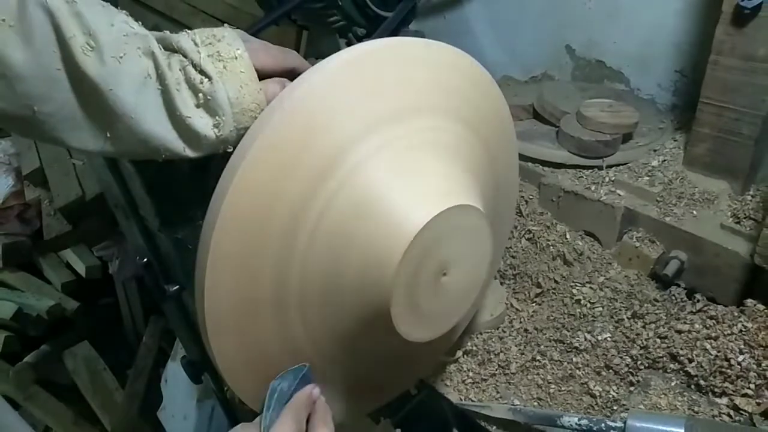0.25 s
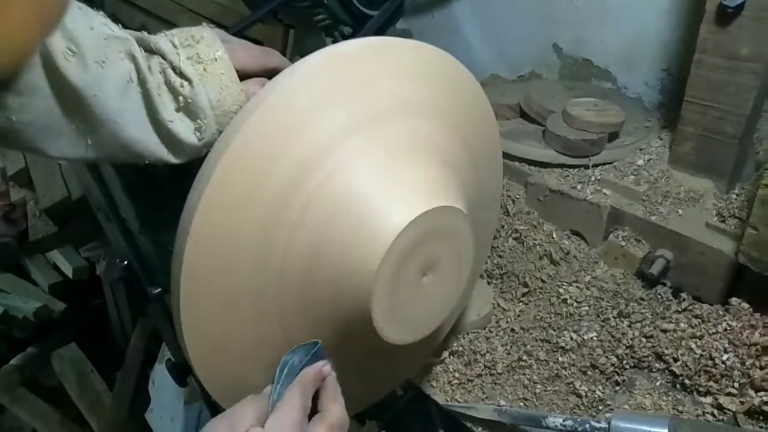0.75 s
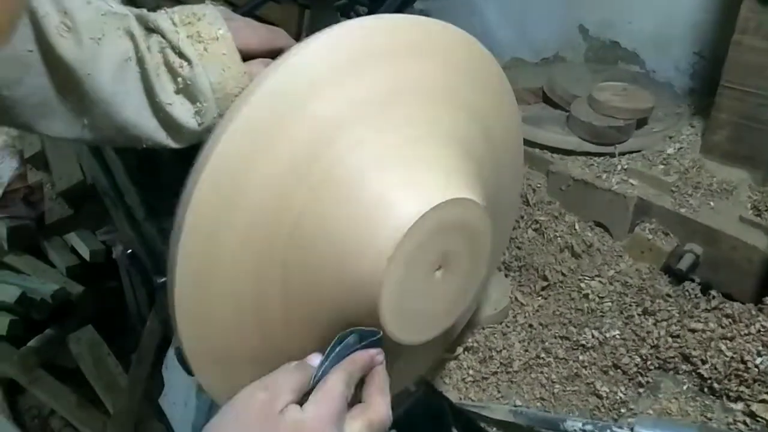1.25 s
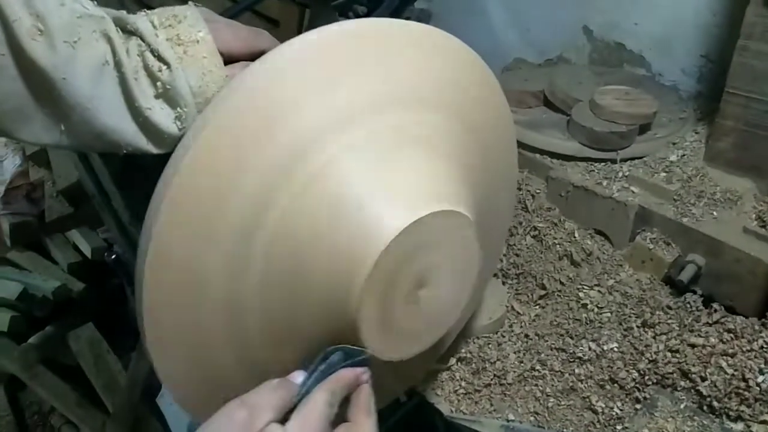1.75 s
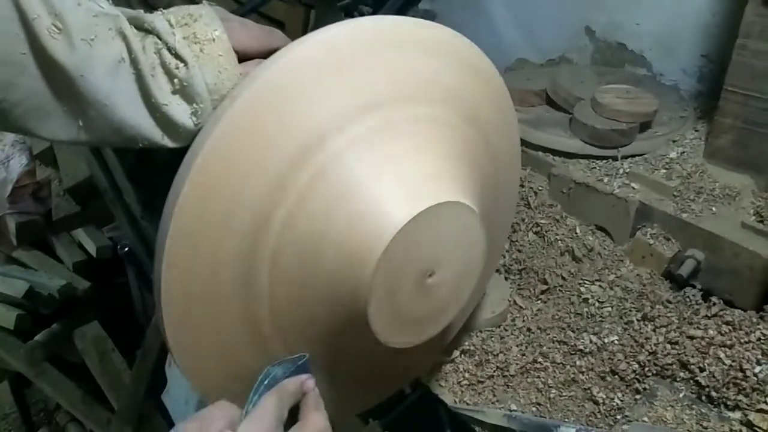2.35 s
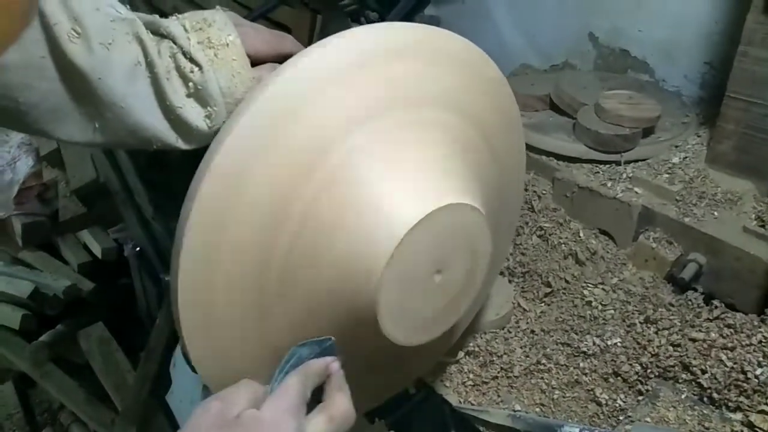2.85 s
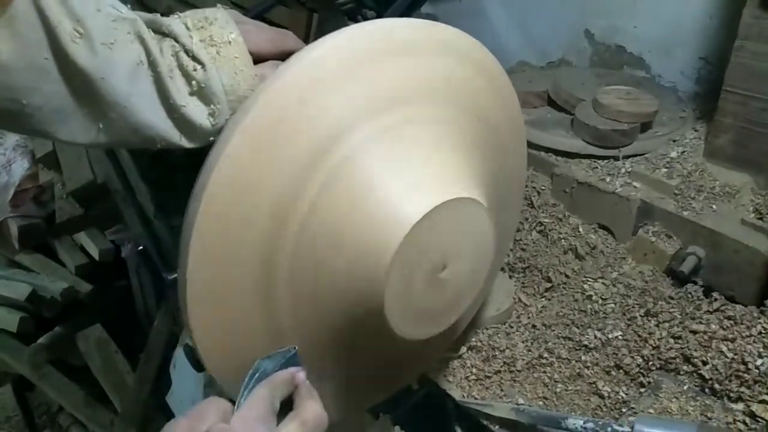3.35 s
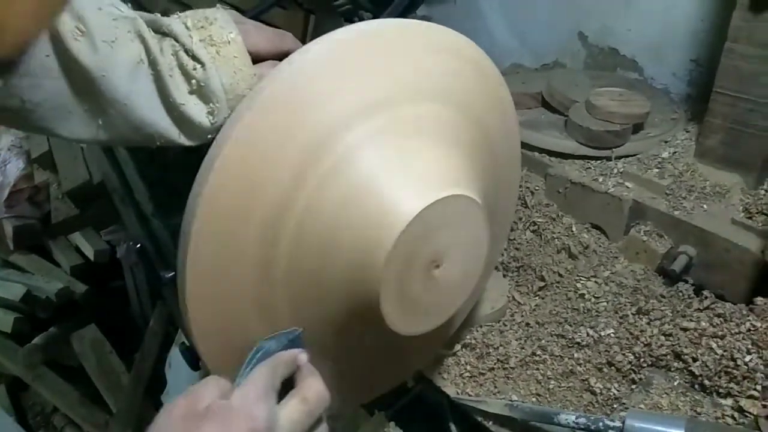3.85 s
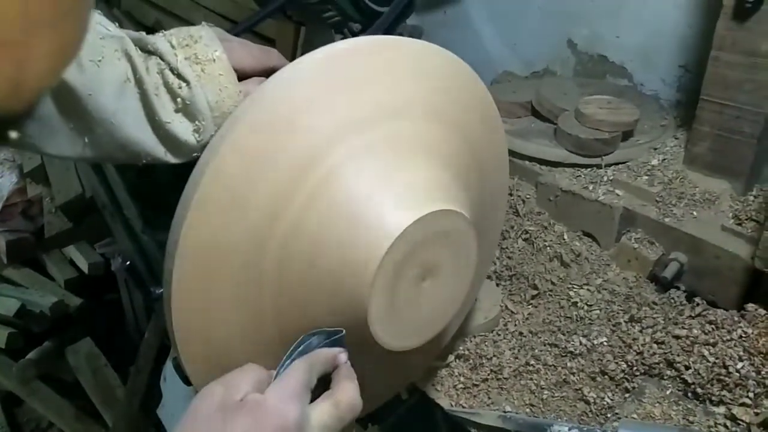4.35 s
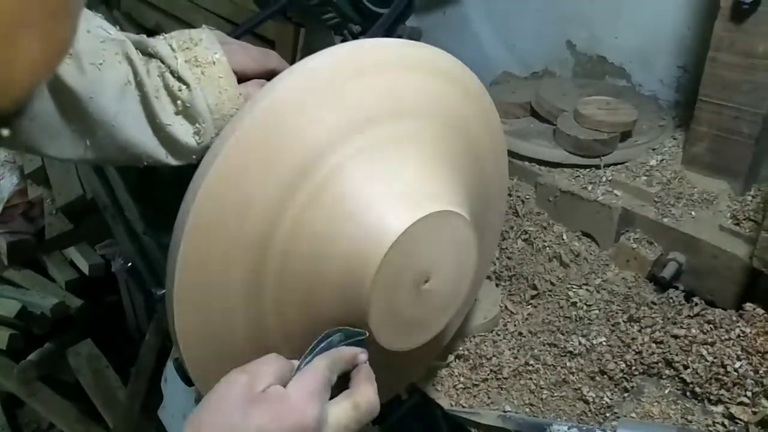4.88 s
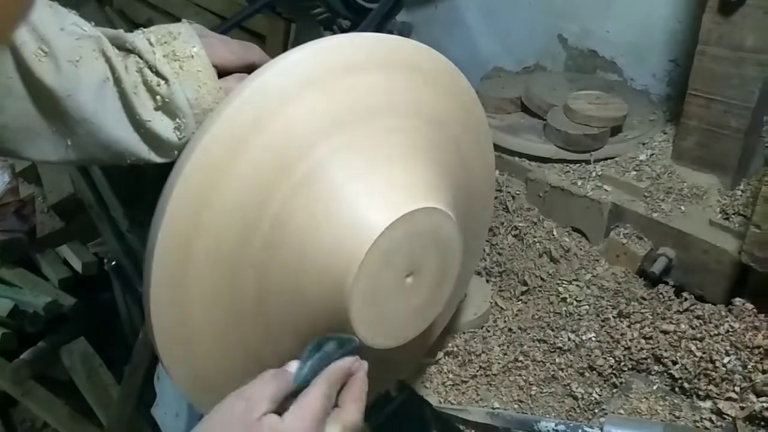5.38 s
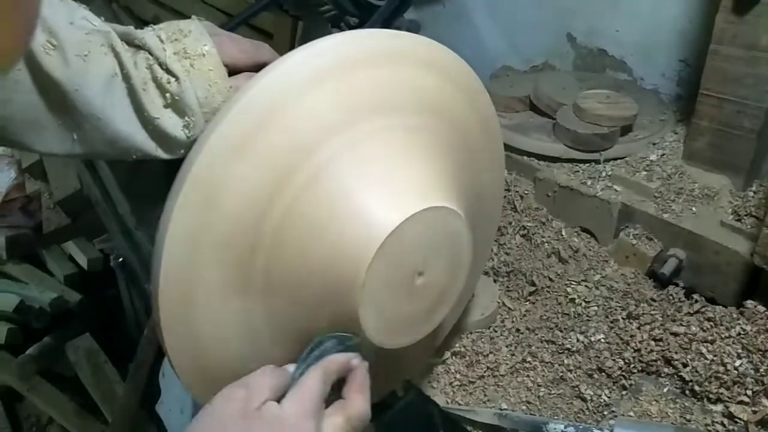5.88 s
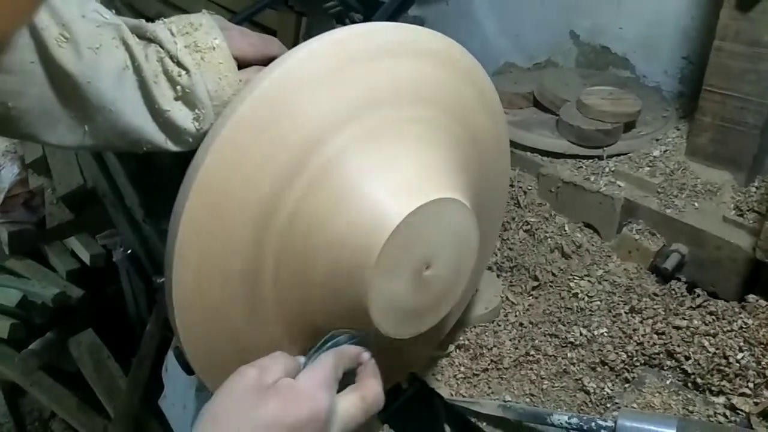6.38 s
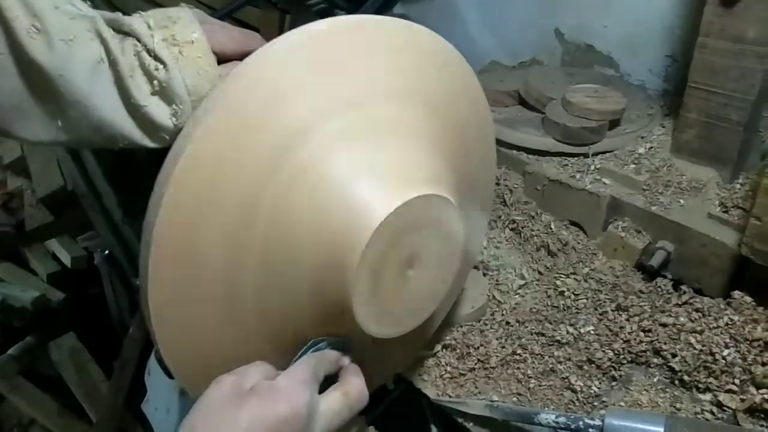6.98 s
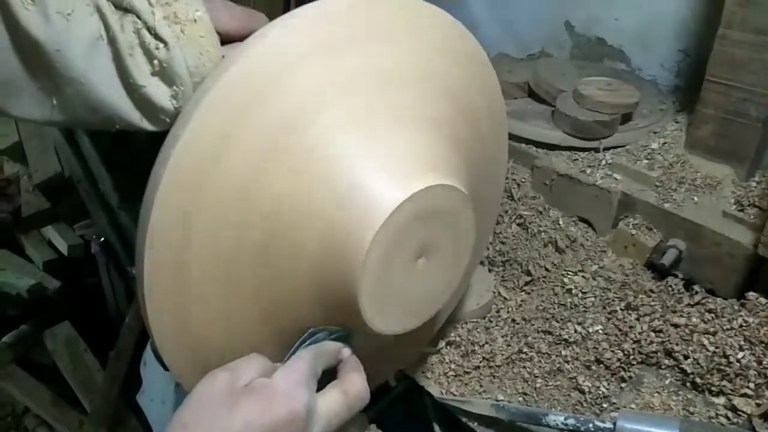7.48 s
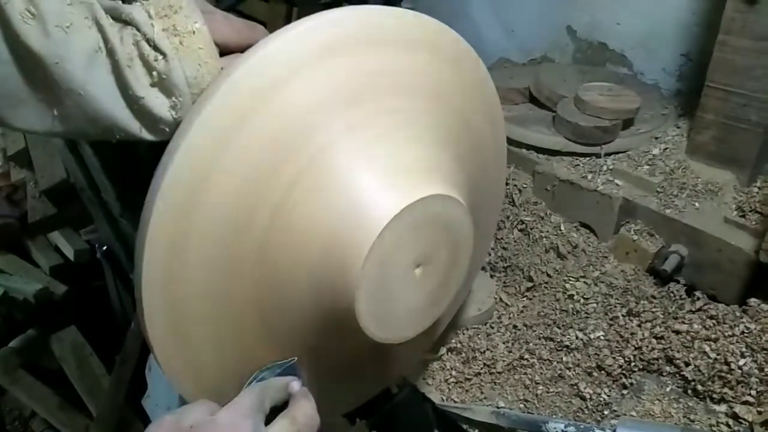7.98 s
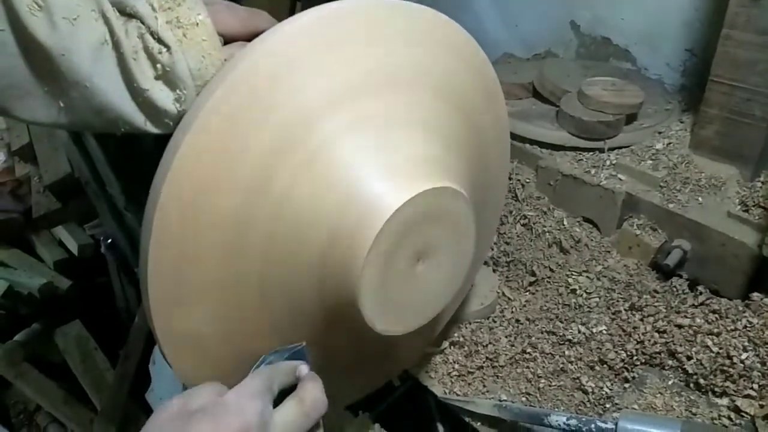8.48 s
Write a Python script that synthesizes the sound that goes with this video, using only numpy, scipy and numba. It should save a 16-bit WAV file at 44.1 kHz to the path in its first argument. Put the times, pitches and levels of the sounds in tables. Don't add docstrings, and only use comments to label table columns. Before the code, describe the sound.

In a workshop, sandpaper rubs a spinning wooden bowl for nearly nine seconds without a break. It starts slightly soft, a bright airy hiss with a dry woody rasp, flickering rapidly about forty times a second. Around 1 s a low snag and a faint high squeak pass; from 1.2 to 1.8 s the rasp turns hollow and scrapy and pressure grows. From 2 to 4 s it is fuller and steadier, with small dips near 3.4 to 3.6 s. At 4.4 to 5.3 s the hand presses hardest: brighter papery ringing, short squeaks at 5.0, two sharp bright snags near 5.2, a faint low belt hum. From 5.6 to 7.3 s thin mid-pitched squeaks flicker amid quick dips, ending in a soft tear. Then even hissing continues to the cut. Quiet low lathe rumble throughout; close, nearly mono, fluttery camera sound.

```python
import sys
import numpy as np
from scipy import signal
from scipy.fft import rfft, irfft, next_fast_len
from scipy.io import wavfile
from scipy.ndimage import uniform_filter1d
from numba import njit

SR = 44100
rng = np.random.default_rng(int(sys.argv[2]) if len(sys.argv) > 2 else 0)


def how_loud(loudness_db):
    steps = np.asarray(loudness_db, float) / 20
    return 10 ** steps


def store_wav(level_fs):
    pcm = np.round(np.clip(np.atleast_2d(level_fs), -1, 1) * 32767)
    wavfile.write(sys.argv[1], SR, pcm.T.astype(np.int16))


N = 384699
TIME = np.arange(N) / SR
BLOCK, FRAME = 256, 1024

# (frequency [Hz], density [dB per Hz])
AIR_TONE = [(5200, -13.5), (5700, -14.5), (6500, -11), (9000, -10.5), (10000, -10.5), (12000, -8.5),
            (13200, -5), (14600, -4), (15100, 0), (15500, -2)]


def curves(table):
    s, *columns = np.transpose(table)
    return [np.interp(TIME, s, c) for c in columns]


def bumps(table):
    s, length, *columns = np.transpose(table)
    control_time = TIME[::BLOCK]
    bell = np.exp(-2 * ((control_time[:, None] - s) / length) ** 2)
    return [np.interp(TIME, control_time, bell @ c) for c in columns]


def walk(rate):
    hold = int(SR / rate)
    stairs = np.repeat(rng.standard_normal(N // hold + 1), hold)
    slewed = uniform_filter1d(uniform_filter1d(stairs, hold), hold)
    return 1.02 * slewed[:N]


def colour(x, points, lo_hz, hi_hz, soft=0.14):
    size = next_fast_len(N)
    log_hz = np.log(np.maximum(np.arange(size // 2 + 1) * SR / size, 1e-3))
    hz, db = np.transpose(points)
    above_low = 1 + np.tanh((log_hz - np.log(lo_hz)) / soft)
    below_high = 1 - np.tanh((log_hz - np.log(hi_hz)) / soft)
    gain = how_loud(np.interp(log_hz, np.log(hz), db)) * np.sqrt(0.25 * above_low * below_high)
    y = irfft(rfft(x, size) * gain, size)[:N]
    return y / np.std(y)


@njit
def svf(x, hz, width):
    y, b, l = np.empty(len(x)), 0., 0.
    for i in range(len(x)):
        g, k = np.tan(np.pi * hz[i] / SR), width / hz[i]
        v = (b + g * (x[i] - l)) / (1 + g * (g + k))
        b, l, y[i] = 2 * v - b, l + 2 * g * v, k * v
    return y


def ring(x, hz, width_hz):
    hz = hz + np.zeros(len(x))
    y = svf(svf(x, hz, 1. * width_hz), hz, 1. * width_hz)
    return y / np.std(y)


def hand():
    # (time [s], contact [dB])
    flatness = [(0.0, 0.5), (0.93, 2.1), (1.3, -4), (1.74, -4.5), (2.11, 2.5), (2.55, 0.8), (3.83, 1.3),
                (3.92, -1.1), (4.08, 2.5), (5.01, -1.6), (5.59, 2.5), (6.03, 2.5), (6.82, -0.5),
                (6.98, -1.5), (7.07, -0.2), (8.0, 2), (8.09, 1), (8.72, 0.7)]
    # (time [s], nearness to the stiff foot of the bowl [dB], pressure [dB])
    hand_moves = [(0.0, -3, -7), (0.65, -1.5, -5), (0.88, 1.5, -2.5), (1.67, 2, 4), (1.97, -1.7, -0.8),
                  (2.97, -2.7, -0.6), (3.34, -1, -5), (3.64, -1, 2), (3.8, -3, -3.7), (4.38, 3.7, -0.1),
                  (4.54, 5.5, 4), (6.24, 2.5, 1.2), (6.4, 0, -1.5), (6.77, 1.5, 2), (7.14, -3.5, -0.5),
                  (7.3, 0.5, 2), (7.53, 0, -1.7), (8.72, -0.2, -0.5)]
    # (middle [s], length [s], change [dB])
    digs = [(0.351, 0.14, 1.0), (1.029, 0.07, 2), (1.379, 0.07, -1.5), (1.473, 0.033, 2.2),
            (1.753, 0.05, 1.2), (2.502, 0.1, -0.5), (2.829, 0.1, 1.2), (4.138, 0.041, 2), (4.255, 0.059, 2),
            (4.769, 0.07, -0.5), (5.05, 0.07, -0.5), (5.143, 0.039, -4), (5.237, 0.043, -0.5),
            (5.775, 0.18, 1.9), (6.265, 0.11, 2.5), (6.897, 0.07, -1.5), (7.107, 0.068, 1.7),
            (7.879, 0.14, 1.8)]
    # (middle [s], length [s], change [dB])
    rocks = [(0, 0.066, -7), (.538, 0.074, -2.2), (.97, 0.016, -1.5), (1.165, 0.025, -3.),
             (1.239, 0.061, -2.5), (1.356, .05, 3.5), (1.445, .04, -1), (1.53, .05, 2), (1.66, 0.033, 3.5),
             (1.8, .06, 2.5), (2.515, 0.045, -2.5), (2.98, 0.054, 2), (3.39, .05, -0.2), (3.577, 0.03, -4),
             (4.29, .04, 1.5), (4.365, .04, -2), (4.49, .04, 0.5), (5.003, .06, -0.5), (5.21, .04, 1),
             (5.285, 0.047, -4), (5.447, 0.046, 2.2), (5.517, .04, -4), (6.406, 0.069, -4),
             (6.51, .05, -2.5), (6.61, 0.028, 2.5), (6.91, 0.031, -6), (7.045, 0.057, -5),
             (7.177, 0.064, -5.5), (7.295, .05, 2.5), (7.645, 0.13, -3), (7.8, 0.052, 3.5)]
    # (time [s], bend [dB])
    bending = [(0, 1.5), (1.1, -3), (1.45, 1), (1.85, -0.5), (2.3, 6), (3.8, 1), (4.9, -3.5), (5.1, 4.5),
               (5.4, 4.5), (6.2, -1), (6.45, 4.5), (7.4, 6), (7.9, 2), (8.72, 6)]
    nearness, pressure = np.array(curves(hand_moves)) + bumps(digs)[0]
    return np.array([curves(flatness)[0], nearness, pressure, bumps(rocks)[0], curves(bending)[0]])


def answer(law, grip):
    return law[0] + np.array(law[1:]) @ grip


def grit(turn, bite, end_db, wobble_db, lag, bite_db, patch_db, tear_db):
    angle = 2 * np.pi * (turn - lag)
    db = end_db * np.cos(2 * angle) + wobble_db * np.cos(angle - 2.5)
    db = db + bite_db * bite + patch_db * walk(25) + tear_db * walk(500)
    return how_loud(db) * rng.standard_normal(N)


def bowl(turn, bite, grip):
    # (frequency [Hz], density [dB per Hz])
    wall_tone = [(130, 2), (280, -5), (660, -1), (1900, -1), (2400, -2.5), (4500, -3), (5300, -3.5),
                 (6500, -2.5)]
    # (middle [s], length [s], tipping [dB])
    tips = [(1.19, .05, 3.5), (1.275, 0.059, 6.5), (1.47, .04, 5.5), (1.6, .03, 6.5), (1.7, 0.029, 3),
            (4.62, .08, 3), (4.92, .05, 1.5), (5.0, 0.055, 3.5), (5.14, 0.083, 2), (5.27, .04, -1),
            (5.54, 0.026, 3.5), (6.67, .04, 2.5), (7.09, 0.027, 2.2), (7.28, 0.077, 2.2)]
    # (level [dB], then dB per dB of contact, nearness, pressure, rocking, bend)
    boom_law = (-65, 1.5, -0.47, 0.64, 1.35, -0.14)
    low_law = (-59, 1.03, -0.2, 0.37, 1.15, -0.06)
    upper_law = (-57.5, 0.42, 0.09, 0.44, .6, 0.12)
    scrape_law = (-58, -0.05, 0.19, 0.57, 0.17, 0.11)
    # (boom, low rasp, upper rasp, scrape [dB per dB])
    tip_shares = (-1.1, -0.25, 0.32, 0.76)
    tip = bumps(tips)[0]
    laws = (boom_law, low_law, upper_law, scrape_law)
    boom_db, low_db, upper_db, scrape_db = (
        answer(law, grip) + share * tip for law, share in zip(laws, tip_shares))

    tear = grit(turn, bite, end_db=2.5, wobble_db=0.5, lag=0., bite_db=0.1, patch_db=0.3, tear_db=3.0)
    fine = grit(turn, bite, end_db=1.45, wobble_db=1.0, lag=0., bite_db=0.5, patch_db=1.65, tear_db=1.0)
    mixed = 0.59 * tear + 0.83 * fine
    edge = grit(turn, bite, end_db=0.93, wobble_db=0.7, lag=-0.1, bite_db=0.55, patch_db=0.4, tear_db=1.6)

    boom = how_loud(boom_db - 0.8) * colour(tear, wall_tone, 154.0, 510, soft=0.098)
    low_rasp = how_loud(low_db) * colour(tear, wall_tone, 553, 1395, soft=0.12)
    upper_rasp = how_loud(upper_db - 0.62) * colour(mixed, wall_tone, 1513, 2940, soft=0.1)
    scrape = how_loud(scrape_db + 0.27) * colour(edge, wall_tone, 2980, 6340, soft=0.06)
    return boom + low_rasp + upper_rasp + scrape


def paper(turn, bite, grip):
    # (frequency [Hz], width [Hz], level [dB])
    pad_modes = [(7160, 1250, -2), (7900, 1550, 0.6)]
    # (level [dB], then dB per dB of contact, nearness, pressure, rocking, bend)
    lower_law = (-61.5, -0.85, 0.77, 0.36, 0.9, 1.5)
    upper_law = (-55.5, .05, 0.74, 0.64, -0.06, -0.14)
    hiss_law = (-56.5, 0, 0.25, 0.28, 0.23, .01)
    finest_law = (-50, 0.46, -0.77, 0.42, 0.56, -0.23)
    ring_rise = (-0.0014, 0.0051)

    hiss = grit(turn, bite, end_db=1.1, wobble_db=0.1, lag=-0.025, bite_db=0.54, patch_db=0.77, tear_db=2.0)
    finest = grit(turn, bite, end_db=1.5, wobble_db=-0.2, lag=0., bite_db=0.8, patch_db=1.2, tear_db=2.2)
    out = how_loud(answer(hiss_law, grip) + 3.5) * colour(hiss, AIR_TONE, 5460, 12150, soft=0.1)
    out = out + how_loud(answer(finest_law, grip) + 2.4) * colour(finest, AIR_TONE, 12340, 16150, soft=0.054)

    opened = np.maximum(grip[-1], 0)
    for (hz, width_hz, db), law, rise in zip(pad_modes, (lower_law, upper_law), ring_rise):
        pad = grit(turn, bite, end_db=1.4, wobble_db=0.5, lag=-0.088, bite_db=0.56, patch_db=1.4, tear_db=1.5)
        drift = 1 + 0.006 * walk(5)
        out = out + how_loud(answer(law, grip) + db) * ring(pad, hz * (drift + rise * opened), width_hz)
    return out


def lathe(turn, bite, grip):
    # (frequency [Hz], density [dB per Hz])
    bed_tone = [(1.8, -34), (3.0, -5), (16, -17), (37, -7.5), (102, -10.5), (300, -11.5), (390, -43),
                (660, -120)]
    # (spindle order, peak level [dB], phase [turns])
    orders = [(1, -71, 0.34), (2, -69.5, 0.18), (3, -99, 0.097), (4, -83, 0.031)]
    # (middle [s], length [s], rumble [dB], sway [dB])
    leans = [(.1, .1, 0.5, 7.), (1.296, 0.092, 3, -2.), (1.55, 0.34, 6, 16), (3.01, .07, 9, 4),
             (3.13, .07, 3, -3.), (3.42, .1, -2.2, 12.), (4.15, .1, 2, 12), (4.9, .2, -1.5, 6),
             (5.225, 0.087, 7.5, 5), (5.58, .12, 3, 11.), (6.19, .1, 3.5, 7.), (6.46, .1, -1.5, -4.),
             (7.08, .15, -5., -8.), (7.65, .1, 1, -2), (7.8, .1, .6, 11.), (8.33, 0.16, -1, .6)]
    # (level [dB], then dB per dB of contact, nearness, pressure, rocking, bend)
    rumble_law = (-67, -0.46, 0.02, -0.15, 0, -0.3)
    sway_law = (-70, 1.8, -0.7, 1.5, -5, -3.2)
    rumble_lean, sway_lean = bumps(leans)
    rumble_db = answer(rumble_law, grip) + rumble_lean
    sway_db = answer(sway_law, grip) + sway_lean

    shake = np.zeros(N)
    for order, db, phase in orders:
        shake += how_loud(db + 1.8 * walk(2.2)) * np.cos(2 * np.pi * (order * turn + phase))
    knock_db = 1.5 * np.cos(4 * np.pi * turn) + 0.8 * walk(15) + 1.4 * bite
    knock = how_loud(knock_db) * rng.standard_normal(N)
    rumble = how_loud(rumble_db - 0.65) * colour(knock, bed_tone, 56.4, 144.5, soft=0.092)
    sway = how_loud(sway_db - 1) * colour(rng.standard_normal(N), bed_tone, 2.5, 20)
    hum = how_loud(-75) * colour(rng.standard_normal(N), bed_tone, 20, 50)
    push = np.exp(-((TIME - 5.0) / 0.38) ** 2)
    strain = how_loud(-68) * push * np.sin(2 * np.pi * 71.5 * TIME)
    return shake + sway + hum + strain + rumble


def squeaks(bite):
    # (middle [s], length [s], pitch [Hz], level [dB])
    squeals = [(.98, 0.3, 7750, -54), (1.622, 0.049, 2050, -59), (1.707, 0.024, 4370, -53),
               (2.65, .17, 1500, -59.5), (2.75, 0.26, 4820, -65), (3.58, .22, 4760, -64),
               (4.635, 0.066, 4300, -59), (4.936, .03, 4270, -61), (5.003, 0.027, 4250, -46),
               (5.037, 0.021, 7340, -47), (5.055, 0.13, 5400, -58), (5.067, .03, 4150, -55),
               (5.21, .025, 4230, -59), (5.25, .03, 5550, -61), (5.294, 0.1, 4230, -58),
               (5.585, 0.09, 2100, -54), (5.746, 0.12, 2130, -56.5), (6.094, .12, 2160, -62),
               (6.253, 0.092, 2100, -56.5), (6.31, 0.072, 3200, -61), (6.607, .19, 2070, -62),
               (6.78, 0.073, 2150, -56.5), (6.78, .08, 3070, -57), (6.93, 0.12, 3160, -61),
               (6.94, 0.15, 2120, -59), (7.117, .054, 2160, -62), (7.223, 0.088, 3060, -59),
               (7.27, 0.17, 2110, -61)]
    # (middle [s], length [s], pitch [Hz], level [dB])
    snags = [
        (0.994, 0.013, 1530, -47.5),
        (5.206, 0.0089, 7200, -44),
        (5.246, 0.014, 7100, -43),
        (7.29, .07, 2780, -52),
    ]
    out, waver = np.zeros(N), walk(20)
    slip = how_loud(2.6 * walk(60) + bite) * rng.standard_normal(N)
    for events, width in ((squeals, 0.078), (snags, 0.45)):
        for s, length, hz, db in events:
            near = np.abs(TIME - s) < 1.5 * length
            swell = np.exp(-2 * ((TIME[near] - s) / (0.75 * length)) ** 4)
            pitch_hz = hz * (1 + 0.007 * waver[near])
            out[near] += how_loud(db) * swell * ring(slip[near], pitch_hz, width * hz)
    return out


def spindle():
    # (time [s], lead over a steady spindle [turns])
    spindle_lead = [(0, 0.081), (1.7, -0.0084), (3.03, 0.072), (3.41, -0.062), (4.2, -0.11), (4.93, -0.18),
                    (6.07, -0.022), (8.34, 0.036), (8.72, -0.065)]
    turn_hz = 21.36
    return turn_hz * TIME + curves(spindle_lead)[0]


def wall_echo(sanding):
    # (time [s], pitch [Hz], depth [0-1])
    notches = [(0, 5600, 0.45), (1.1, 5600, 0.25), (1.5, 6260, 0.25), (2.1, 5530, 0.4), (3, 5630, 0.6),
               (4.05, 5900, 0.4), (4.4, 5300, 0.14), (5.1, 6000, .3), (5.4, 5300, .5), (6.4, 5320, 0.4),
               (7.2, 5160, 0.7), (7.5, 5300, 0.3), (8.2, 5700, 0.5), (8.72, 5700, .6)]
    notch_hz, depth = curves(notches)
    return sanding - np.clip(depth, 0, 0.9) * svf(sanding, notch_hz, 560.)


def scene():
    turn, bite, grip = spindle(), walk(60), hand()
    sanding = wall_echo(bowl(turn, bite, grip) + paper(turn, bite, grip))
    mono = sanding + lathe(turn, bite, grip) + squeaks(bite)
    return np.array([mono, mono])


def patchy(x, spread_db, band_bins):
    hz, _, cells = signal.stft(x, SR, nperseg=FRAME)
    error = rng.standard_normal((len(hz) // band_bins + 1, cells.shape[-1] // 2 + 1))
    error = np.repeat(np.repeat(error, band_bins, axis=0), 2, axis=1)
    error = error[:len(hz), :cells.shape[-1]]
    gain = how_loud(spread_db * error * np.clip(hz / 3000, 0, 1)[:, None])
    return signal.istft(cells * gain, SR, nperseg=FRAME)[1][..., :N]


def flutter(dry):
    n = np.arange(N)
    ripple_db = 0.81 * np.cos(2 * np.pi * (n - 190) / BLOCK)
    depth = rng.exponential(size=N // FRAME + 1)[n // FRAME]
    dip_db = -1.8 * depth * np.exp(-((n % FRAME - 570) / 70) ** 2)
    bass = signal.sosfiltfilt(signal.butter(2, 1200, fs=SR, output="sos"), dry)
    return bass * how_loud(1.5 * ripple_db) + (dry - bass) * how_loud(ripple_db + dip_db)


def split_frames():
    # (time [s], low edge [Hz], high edge [Hz], level [dB])
    splits = [(7.172, 6300, 7700, -58), (7.172, 10300, 12500, -57), (7.172, 13100, 15500, -50),
              (8.054, 6300, 7700, -58), (8.054, 13100, 14600, -55), (8.449, 4200, 5800, -60)]
    out = np.zeros((2, N))
    for s, lo_hz, hi_hz, db in splits:
        frame = np.cos(np.pi / 2 * np.clip((TIME - s) * SR / FRAME / 0.4, -1, 1))
        side = how_loud(db) * frame * colour(rng.standard_normal(N), AIR_TONE, lo_hz, hi_hz, soft=0.005)
        out += np.array([side, -side])
    return out


def roll_off(x):
    return signal.sosfilt(signal.butter(12, 16850, fs=SR, output="sos"), x)


def record(dry):
    dry = patchy(dry, spread_db=1.28, band_bins=6)
    out = flutter(dry) + 0.0004 + split_frames()
    size = next_fast_len(N)
    below_top = np.arange(size // 2 + 1) * SR / size < 15495
    out = irfft(rfft(out, size) * below_top, size)[:, :N]
    return roll_off(out)


dry = scene()
out = record(dry)
store_wav(out)
```